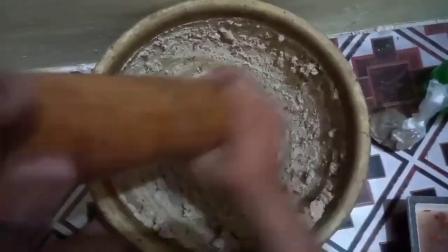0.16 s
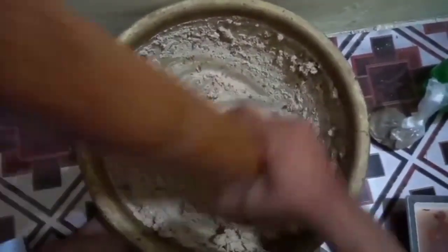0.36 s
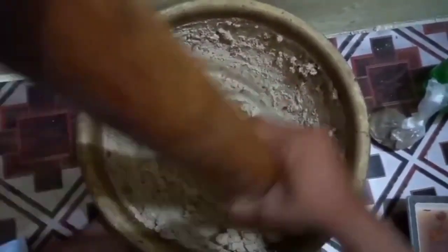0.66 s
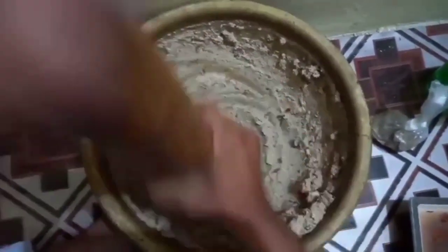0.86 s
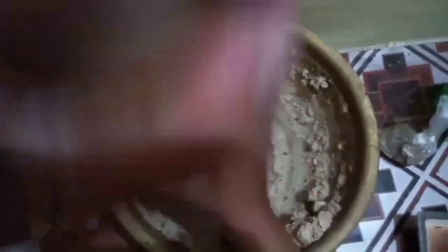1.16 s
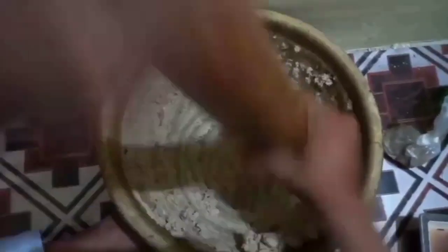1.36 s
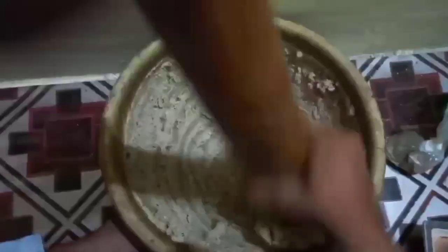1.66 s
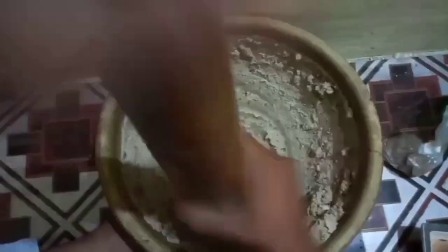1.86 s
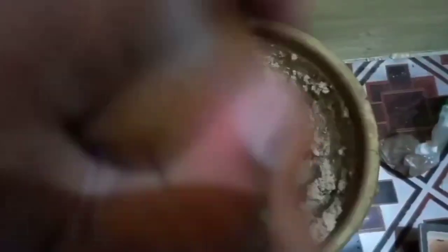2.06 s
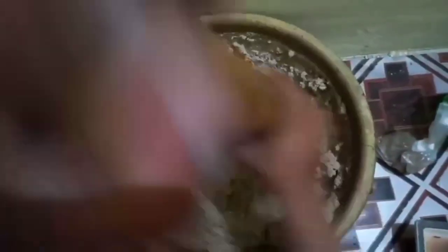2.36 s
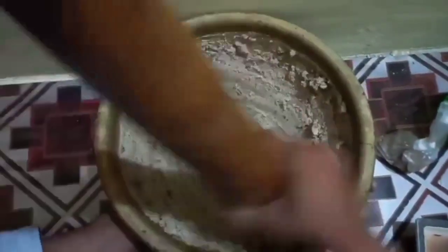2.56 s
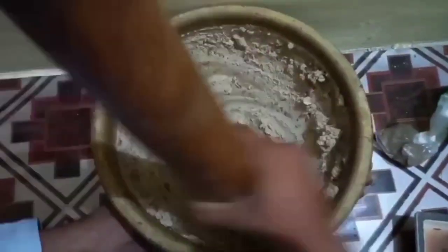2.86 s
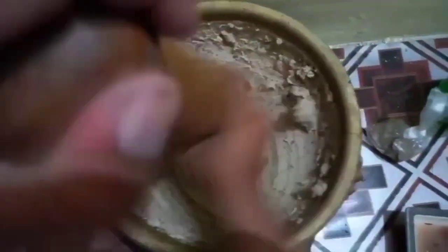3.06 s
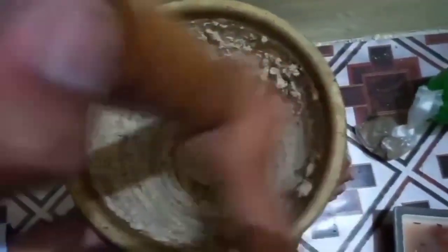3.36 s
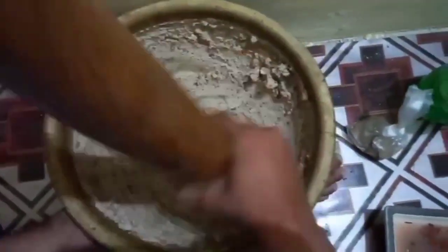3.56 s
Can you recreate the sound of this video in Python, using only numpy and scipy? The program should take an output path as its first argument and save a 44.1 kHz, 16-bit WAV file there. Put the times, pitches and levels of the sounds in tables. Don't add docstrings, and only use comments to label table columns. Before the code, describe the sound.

A pestle rubs round a bowl of wet paste, with low knocks and wet crackles

```python
import sys
import numpy as np
from scipy import signal
from scipy.fft import rfft, irfft, next_fast_len
from scipy.io import wavfile
from scipy.ndimage import uniform_filter1d, map_coordinates

SR = 44100
rng = np.random.default_rng(int(sys.argv[2]) if len(sys.argv) > 2 else 0)


def store_pcm(level_fs):
    pcm = np.round(np.clip(level_fs, -1, 1) * 32767).astype(np.int16)
    wavfile.write(sys.argv[1], SR, np.atleast_2d(pcm).T)


def voltage_ratio(decibels):
    exponent = np.asarray(decibels, float) / 20
    return 10 ** exponent


N = 163170
T_S = np.arange(N) / SR

# start in seconds, length in seconds, pressure in dB, early scrape in dB, late glaze in dB.
STROKES = [(0.006, 0.024, -43, -62, -56), (0.204, 0.25, -24, -54, -33), (0.517, 0.25, -21, -37.5, -35),
           (0.863, 0.16, -20.5, -36, -33.5), (1.161, 0.2, -19, -32, -29.5), (1.477, 0.21, -17, -32, -29),
           (1.801, 0.19, -16.5, -36.5, -33), (2.132, 0.19, -16, -33.5, -33.5),
           (2.458, 0.22, -18, -35.5, -34.5), (2.792, 0.22, -20.5, -35.5, -37),
           (3.141, 0.14, -16.5, -35, -34), (3.371, 0.17, -30, -45, -47), (3.466, 0.089, -24.5, -37, -47)]
# start in seconds, peak in dB, pitch in Hz.
JOLTS = [(.275, -17, 420), (.365, -4.5, 407), (0.541, -3, 428), (.655, -20, 420), (0.714, -11.5, 405),
         (.932, -4, 446), (1.19, -15, 450), (1.265, -2.5, 390), (1.315, -7, 431), (1.499, -4.5, 410),
         (1.62, -6, 368), (1.835, -4.5, 457), (1.965, -6.5, 441), (2.154, -9, 430), (2.235, -19, 420),
         (2.274, -1, 401.6), (2.474, -10, 428), (2.53, -8, 460), (2.611, -6, 422), (2.865, -10, 436.4),
         (3.193, -6.5, 385), (3.212, -3, 420), (3.241, -4.5, 348), (3.504, -6.5, 421)]
# centre in Hz, width in Hz, level in dB.
BELLY_MODES = [(282.7, 14, -5), (348.3, 25.6, -1.5), (385, 29, -4), (420, 33.4, -2.5), (449.4, 31.8, 0.5),
               (501.7, 27.4, -3)]
FOOT_MODES = [(60.4, 35, -10.5), (86.6, 32, -5.5), (122.4, 30, -3), (165, 20.3, -3), (214.1, 21.9, -1.5),
              (234.7, 18.4, 1)]
WALL_MODES = [(628.5, 20.7, -4), (705, 32.6, -3), (816, 69, -5.5), (897, 78, -6.5), (942, 35, -3),
              (1076, 54, -17.5)]
SCRAPE_MODES = [(2560, 126, 10.5), (3455, 120, 9), (3970, 117, 11.5), (1380, 780, -2), (2950, 1960, 5)]
GLAZE_MODES = [(1987, 37, 5), (1410, 910, -8.5), (2650, 190, -4.5)]
# time in seconds, level in dB.
WETNESS = [(0.0, -47.5), (0.03, -42.5), (0.05, -48.5), (0.34, -34.5), (0.39, -40), (0.68, -31.5),
           (0.75, -35), (0.93, -32), (0.94, -27.5), (0.97, -35), (3.04, -38), (3.18, -35), (3.22, -32.5),
           (3.24, -40.5), (3.41, -37.5), (3.53, -29.5), (3.69, -43), (3.7, -44)]
# frequency in Hz, density in dB per Hz.
FIZZ_SPECTRUM = [(650, -49), (1100, -0.5), (1490, -8.5), (1940, -2), (2600, 1), (6620, -7.5), (7910, -2.5),
                 (14000, -4), (15800, -11.5)]
# frequency in Hz, left over right in dB.
FIZZ_PAN = [(1000, -2), (4000, -3.5), (9000, -3), (13000, -5)]
# start in seconds, peak in dB, left over right in dB.
SNAPS = [(0.0209, -24.5, -11), (0.3242, -23, -13), (0.867, -16, -1), (0.9332, -14.5, -1),
         (1.0286, -26, -5.5), (1.4359, -19.5, -6.5), (1.5873, -23, -9.5), (1.927, -26, -11.0),
         (2.228, -17, -12.5), (2.2398, -19, -9), (2.3395, -24, -7), (2.953, -23, -1), (3.1395, -22, -4.5),
         (3.2046, -24, -9.5), (3.2219, -15, -12), (3.53, -20, -7.5)]
# frequency in Hz, density in dB per Hz.
HUM_SPECTRUM = [(18, -56), (30, -21), (87, -3.5), (140, -4), (282, -25), (439, -19), (1500, -42.5),
                (1950, -70), (3300, -120)]
# frequency in Hz, left-right correlation from 0 to 1.
LIKENESS = [(30, 0.73), (125, 0.93), (300, 0.92), (550, 0.91), (1000, 0.36), (3000, 0.028)]


def unit(x):
    return x / np.sqrt(np.mean(x ** 2) + 1e-20)


def along(points, hz):
    point_hz, value = np.transpose(points)
    return np.interp(np.log(hz + 1), np.log(point_hz + 1), value)


def wobble(knots_per_s):
    knots = rng.standard_normal(int(N * knots_per_s / SR) + 4)
    return map_coordinates(knots, [np.arange(N) * knots_per_s / SR])


def filtered(x, response):
    size = next_fast_len(N + SR // 2)
    hz = np.fft.rfftfreq(size, 1 / SR)
    return irfft(rfft(x, size) * response(hz), size)[..., :N]


def mid_side_gains(hz):
    angle = np.arccos(np.clip(along(LIKENESS, hz), -1, 1)) / 2
    return np.array([np.cos(angle), np.sin(angle)])


def kitchen():
    noise = rng.standard_normal((2, N))
    mid, side = filtered(noise, lambda hz: voltage_ratio(along(HUM_SPECTRUM, hz)) * mid_side_gains(hz))
    return voltage_ratio(-30.5 + 1.8 * wobble(4.2)) * unit(np.array([mid + side, mid - side]))


def grit(catches_per_s, spread_db):
    hit = rng.random((2, N)) < catches_per_s / SR
    sign_and_size = rng.standard_normal((2, N)) * voltage_ratio(spread_db * rng.standard_normal((2, N)))
    return unit(hit * sign_and_size)


def paste_fizz():
    def colour(hz):
        pan_db = along(FIZZ_PAN, hz) * np.array([[0.5], [-0.5]])
        return voltage_ratio(along(FIZZ_SPECTRUM, hz) + pan_db) * (hz > 900)
    unsteady_db = 2.6 * wobble(12) + 1.9 * np.array([wobble(60), wobble(60)])
    return unit(filtered(rng.standard_normal((2, N)) * voltage_ratio(unsteady_db), colour))


def paste_smacks():
    puff_s, corner_hz = 0.0027, 13800
    partings = np.abs(grit(240, 6.5) * voltage_ratio(4.2 * wobble(9.92)))
    puffs = np.abs(uniform_filter1d(partings, max(int(puff_s * SR), 1), axis=1))
    noise = puffs * rng.standard_normal((2, N))
    smacks = unit(filtered(noise, lambda hz: 1 / (1 + (corner_hz / (hz + 1)) ** 5)))
    return smacks * voltage_ratio([[-9], [3]])


def paste_snaps():
    t60_s = 0.0039
    out = np.zeros((2, N + SR))
    t_s = np.arange(SR // 100) / SR
    bursts = rng.standard_normal((len(SNAPS), 2, len(t_s)))
    for (start_s, peak_db, pan_db), burst in zip(SNAPS, bursts):
        decay = voltage_ratio(peak_db + 4.5 - 60 * t_s / t60_s)
        pan = voltage_ratio([[pan_db / 2], [-pan_db / 2]])
        out[:, round(start_s * SR):][:, :len(t_s)] += decay * np.diff(burst, prepend=0) * pan
    return out[:, :N]


def paste():
    wet = voltage_ratio(np.interp(T_S, *np.transpose(WETNESS)))
    return wet * (voltage_ratio(4) * paste_fizz() + voltage_ratio(7) * paste_smacks()) + paste_snaps()


def jolts():
    rise_s, t60_s, thud_db, thud_hz = 0.0073, 0.14, -9.5, 231.2
    out = np.zeros(N + SR)
    t_s = np.arange(SR // 5) / SR
    envelope = np.sin(np.pi / 2 * np.clip(t_s / rise_s, 0, 1)) ** 2 * voltage_ratio(-60 * t_s / t60_s)

    def tone(hz, turns):
        return np.sin(2 * np.pi * (hz * t_s + turns))

    for (start_s, peak_db, hz), (a, b, c, d) in zip(JOLTS, rng.random((len(JOLTS), 4))):
        wave = tone(hz, a)
        wave = wave + 0.32 * tone(hz * (0.78 + 0.093 * d), b)
        wave = wave + voltage_ratio(thud_db) * tone(thud_hz, c)
        wave = wave + 0.34 * tone(hz * 1.16, d)
        out[round(start_s * SR):][:len(t_s)] += voltage_ratio(peak_db) * envelope * wave
    return out[:N] * voltage_ratio([[0.4], [-0.4]])


def ring(pair, force, modes):
    def response(hz):
        body = 0
        for k, (centre_hz, width_hz, db) in enumerate(modes):
            damping = 1j * hz * width_hz
            body = body + (-1) ** k * voltage_ratio(db) * damping / (centre_hz ** 2 - hz ** 2 + damping)
        return body * mid_side_gains(hz)
    scale = np.sqrt(np.mean(filtered(pair, response) ** 2) * 2)
    mid, side = filtered(pair * force, response) / scale
    return np.array([mid + side, mid - side])


ATTACK_S = 0.032


def press(lag_s, let_go_db_per_s):
    sag_db_per_s = 10
    force = np.zeros(N)
    for start_s, length_s, db, _, _ in STROKES:
        t_s = T_S - start_s
        released_s = np.clip(t_s - length_s - lag_s, 0, None)
        bite = np.clip(t_s / (ATTACK_S + lag_s), 0, 1)
        force += voltage_ratio(db - sag_db_per_s * np.abs(t_s) - let_go_db_per_s * released_s) * bite
    return force


def scrape_force():
    hold_s = 0.099
    force = np.zeros(N)
    for start_s, _, _, db, _ in STROKES:
        t_s = T_S - start_s
        fade = np.exp(-np.clip((t_s - hold_s) / hold_s, 0, None) ** 2)
        force += voltage_ratio(db) * np.clip(t_s / ATTACK_S, 0, 1) * fade
    return force


def glaze_force():
    latest_s, spread_s = 0.21, 0.046
    force = np.zeros(N)
    for start_s, length_s, _, _, db in STROKES:
        peak_s = start_s + min(latest_s, length_s * 0.885)
        force += voltage_ratio(db) * np.exp(-0.5 * ((T_S - peak_s) / spread_s) ** 2)
    return force


def bowl():
    belly = ring(grit(900, 5.5), press(0, 152) * voltage_ratio(0.64 * wobble(24.79)), BELLY_MODES)
    foot = ring(grit(900, 5.5), press(0.043, 73) * voltage_ratio(-2), FOOT_MODES)
    wall = ring(grit(1500, 4.3), press(0.0067, 127) * voltage_ratio(-12 + 2.1 * wobble(29.8)), WALL_MODES)
    scrape = ring(grit(4000, 3.3), scrape_force() * voltage_ratio(3.65 * wobble(34.96)), SCRAPE_MODES)
    glaze = ring(grit(3000, 3), glaze_force() * voltage_ratio(2.4 * wobble(30.1)), GLAZE_MODES)
    return belly + foot + wall + scrape + glaze


def scene():
    return kitchen() + paste() + jolts() + bowl()


def low_pass(x):
    return signal.sosfilt(signal.butter(12, 16200, fs=SR, output="sos"), x)


def record(dry):
    bass_hz, top_hz = 45, 15850
    x = filtered(dry, lambda hz: (hz < top_hz) * (1j * hz / (bass_hz + 1j * hz)) ** 2)
    clipped = x / (1 + np.abs(x) ** 8) ** (1 / 8)
    return low_pass(clipped)


dry = scene()
out = record(dry)
store_pcm(out)
```